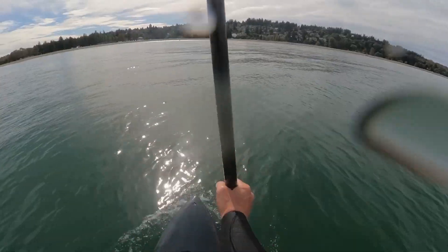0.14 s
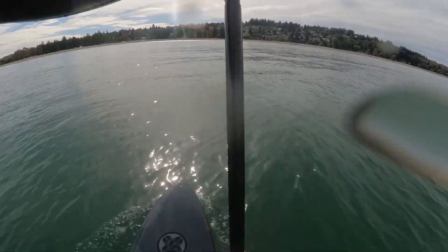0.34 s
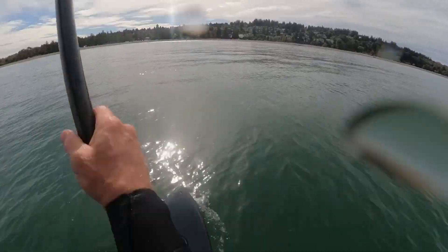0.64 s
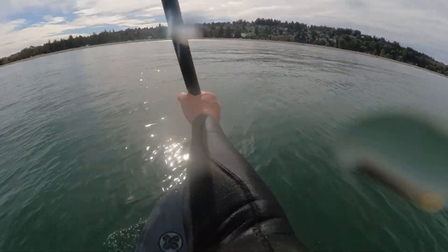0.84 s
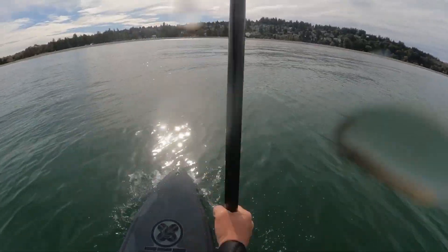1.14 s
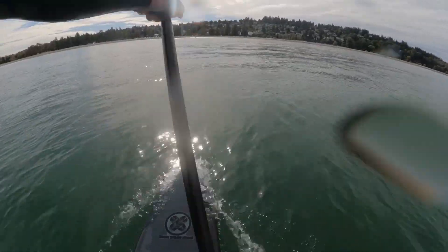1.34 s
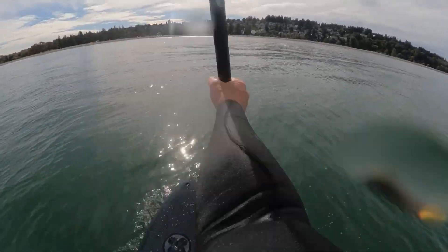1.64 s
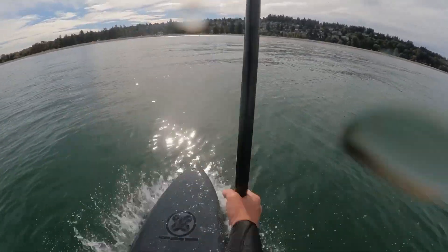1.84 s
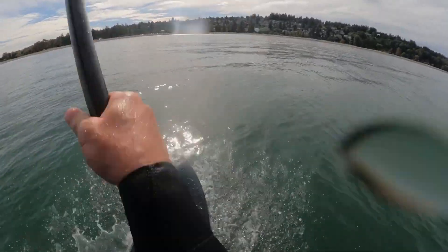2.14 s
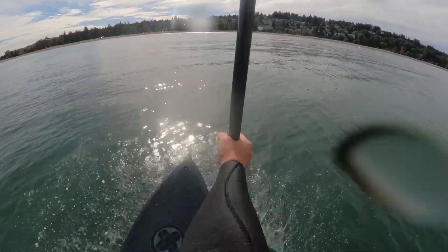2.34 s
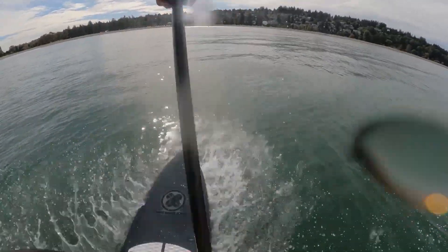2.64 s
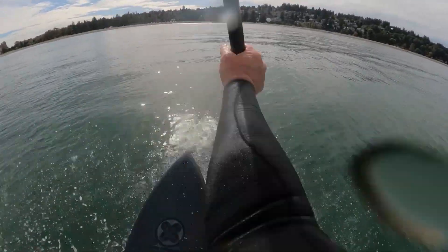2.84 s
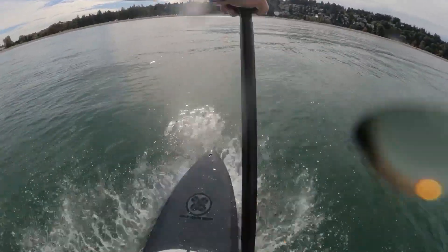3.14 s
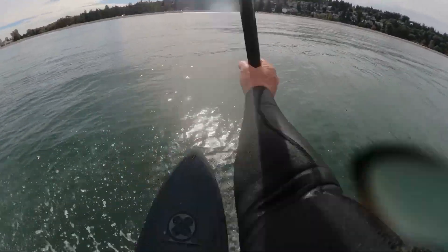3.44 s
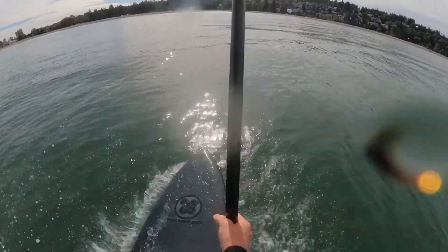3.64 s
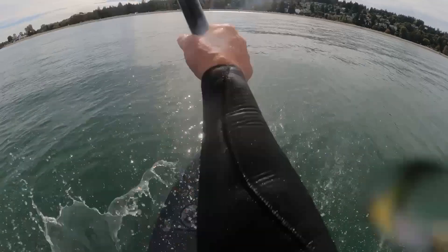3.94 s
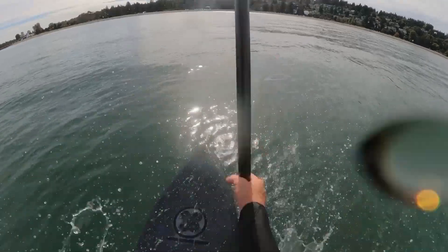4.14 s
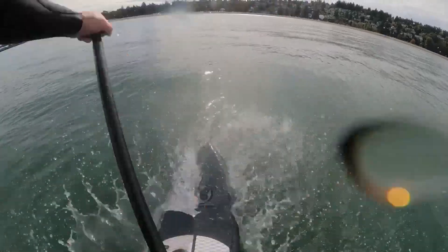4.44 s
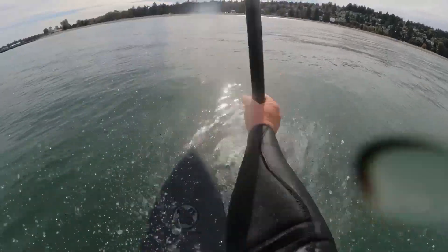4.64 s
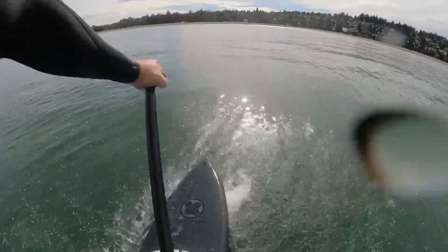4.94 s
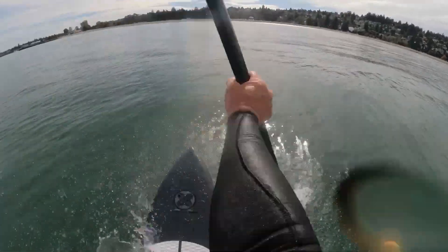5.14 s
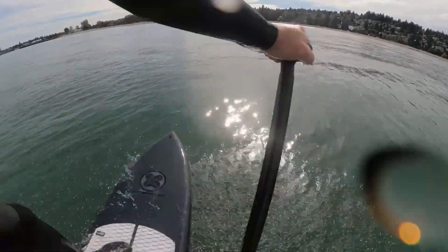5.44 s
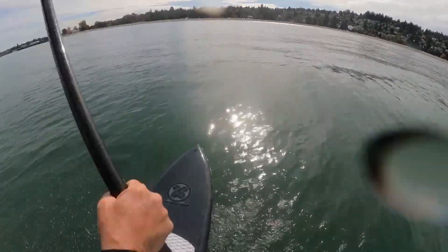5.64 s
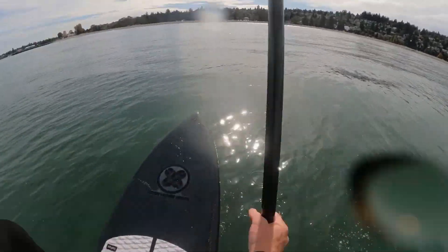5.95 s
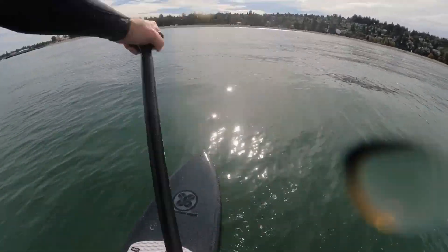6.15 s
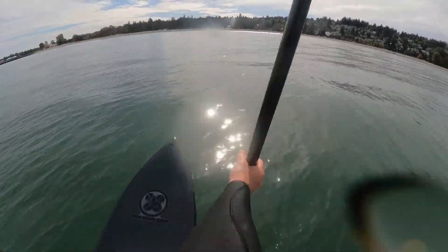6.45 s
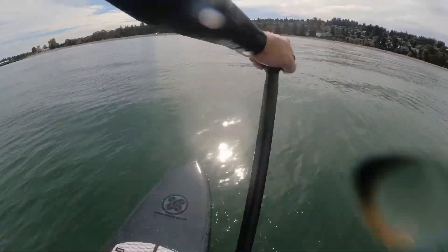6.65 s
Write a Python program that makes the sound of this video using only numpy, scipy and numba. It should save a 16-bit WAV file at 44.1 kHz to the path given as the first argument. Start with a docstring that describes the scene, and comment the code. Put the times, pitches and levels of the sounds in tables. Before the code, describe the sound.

A body-worn, wet camera close to the water catches a paddleboard crossing a choppy lake. From 0 to 0.8 s, low wind and soft bow wash carry small gurgles and a few plops. Around 0.9 to 1.4 s a paddle stroke brings a rush, dripping taps and a cluster of round plops. At 1.8 to 1.95 s the bow lands with a deep churning splash and slaps. More slaps come near 2.5, 3.1 and 3.7 s, with spray cracking on the case around 2.9 and 4.05 s. The heaviest thump and foamy burst is at 4.3 s; another slap and big plop follow at 4.95 to 5 s. Bubbly slaps and falling water return at 5.5 to 5.65 s, then a grainy splash with pattering drops at 6.1 to 6.35 s, settling into light wash and drips until about 7 s. Fine mist prickles and hisses; wind gusts rumble irregularly throughout.

```python
"""On a choppy lake a paddle board is driven forward, heard from a wet action camera worn by the paddler.
Bow wash and paddle strokes are clouds of ringing bubbles with foam hiss; larger bubbles plop and cavities gurgle.
The hull slaps on trapped air, modelled as chirping damped bubbles; spray is random clicks that ring the case.
Flung drops tap in short noise bursts, thrown sheets of water land in a grainy rush, and fine mist prickles
and hisses. Low-frequency noise, swelling in gusts, is the wind on the microphone."""
import sys
import numpy as np
from scipy import signal
from scipy.fft import rfft, irfft
from scipy.io import wavfile
from scipy.ndimage import uniform_filter1d
from numba import njit

SR = 44100
rng = np.random.default_rng(int(sys.argv[2]) if len(sys.argv) > 2 else 0)


def unload_audio(sound):
    """Save the sound as a 16-bit wav file, at the path given as the first command line argument."""
    columns = np.transpose(np.atleast_2d(sound))
    # keep every value between -1 and 1, then stretch to whole-number steps
    steps = np.round(np.clip(columns, -1, 1) * 32767)
    wavfile.write(sys.argv[1], SR, steps.astype(np.int16))


N = 299439

# thin high tick of a droplet on the case: frequency_hz, relative_gain_db
DROPLET_RESPONSE = [(3000, -46), (10700, -46.5), (11500, -9.5), (12200, 2.5), (13000, -10.5), (14200, -7),
                    (15500, -17)]
# hollow tap of a drop: frequency_hz, relative_gain_db
TAP_RESPONSE = [(300, -41), (900, 6.5), (1700, 4.5), (2200, -8.5), (3000, -27), (5000, -39), (9000, -77.5)]
# snap of a drop: frequency_hz, relative_gain_db
SNAP_RESPONSE = [(1000, -20), (1500, -6), (1900, 3.5), (2400, -7.5), (3000, -15.5), (4000, -31),
                 (8000, -58)]
# sharp edge of a drop's snap: frequency_hz, relative_gain_db
EDGE_RESPONSE = [(1500, -18.5), (2600, -10), (3600, 15.5), (4600, -7.5), (6000, -5.5), (7500, -28),
                 (9500, -30.5), (12000, -56.5)]


def wash(flutter_db=1.12, deep_db=0, flow_db=0.45, foam_db=0.55, surge_db=-2,
         gurgle_db=-7.0, fizz_db=-6.0, pop_db=-9, spatter_db=-10):
    """Bubble-cloud radiation: torn water sums many short damped oscillations, under a foam hiss."""
    # steady wash along the bow, before trims: time_s, rushing_db, churning_db, foam_db
    bow_levels = [(0.0, -40, -42.5, -50), (.17, -36, -37.5, -49.5), (.29, -43, -34.5, -52),
                  (0.47, -41, -29, -51.5), (.66, -38, -35, -53), (0.87, -37, -32, -47.5),
                  (1.1, -34, -33, -47.5), (1.3, -31, -32.5, -46), (1.91, -32.5, -31.5, -50),
                  (2.36, -36, -35, -46.5), (2.8, -34.5, -32, -51.5), (2.98, -31, -39.5, -50.5),
                  (3.08, -31.5, -26, -51.5), (3.38, -33, -34.5, -51.5), (3.72, -33, -37, -47),
                  (3.88, -33, -29.5, -50), (4.03, -36, -34, -52), (4.13, -35.5, -42.5, -48.5),
                  (4.25, -33, -29, -47.5), (4.44, -40, -33.5, -52.5), (4.6, -34, -34, -57.5),
                  (4.84, -37.5, -40, -49), (4.99, -35, -31, -47.5), (5.25, -39.5, -38.5, -54.5),
                  (5.36, -48, -39, -58), (5.45, -39.5, -37, -50.5), (5.76, -41, -30.5, -53.5),
                  (5.88, -39, -41.5, -53), (6.06, -35, -29.5, -57), (6.26, -37, -24.5, -53),
                  (6.44, -30, -35.5, -53.5), (6.5, -39.5, -33, -52.5), (6.6, -37, -34, -51),
                  (6.79, -37, -37, -47)]
    # water pushed aside by a stroke or a landing of the bow, before surge_db:
    # full_s, hold_s, rushing_db, churning_db, foam_db
    surge_events = [(0.372, 0.094, -32, -32, -47.5), (0.763, 0.029, -32, -47, -47),
                    (0.95, 0.07, -23.5, -40, -44), (1.255, 0.12, -28.5, -39, -48),
                    (1.525, 0.042, -27, -35, -47), (1.837, 0.041, -21.5, -15.5, -49),
                    (1.931, 0.015, -18.5, -26.5, -42.5), (2.108, 0.12, -28.5, -30, -62),
                    (2.34, 0.11, -28, -32.5, -65.5), (2.496, 0.11, -22.5, -21, -44.5),
                    (2.645, 0.014, -26.5, -22.5, -63), (2.884, 0.041, -34.5, -47, -42),
                    (3.079, 0.06, -24.5, -34, -42.5), (3.167, 0.01, -26, -21, -46),
                    (3.614, 0.088, -41, -30.5, -50), (3.721, 0.02, -22.5, -25.5, -43),
                    (3.778, 0.038, -32.5, -23, -46.5), (4.021, 0.018, -29.5, -27.5, -54),
                    (4.193, 0.032, -30, -28.5, -59), (4.292, 0.019, -21, -15, -36.5),
                    (4.92, 0.069, -30, -21.5, -45.5), (5.052, 0.069, -36.5, -27.5, -68),
                    (5.4, 0.02, -38, -42, -48), (5.5, 0.062, -27, -22, -47.5),
                    (5.601, 0.1, -27.5, -20.5, -47.5), (5.975, 0.012, -32.5, -33, -58),
                    (6.143, 0.28, -30.5, -37, -51), (6.758, .04, -34, -47.5, -46)]
    # torn water: frequency_hz, relative_gain_db
    water_response = [(70, -14), (130, 2), (220, 0), (450, 0), (700, -3), (950, -5), (1250, -13),
                      (1800, -23), (2500, -36.5), (4000, -47), (8000, -78)]
    # foam: frequency_hz, relative_gain_db
    foam_response = [(600, -22.5), (1200, -3.5), (1550, -2), (2000, -8), (2500, -10.5), (2800, -12),
                     (3050, -18), (3700, -18), (4200, -32), (4800, -27.5), (5700, -31.5), (6400, -38.5),
                     (7300, -37), (9500, -62)]
    attack_s, release_s = 0.016, 0.019

    torn = cloud(count=16000, spread_db=1.5, ring_cycles=4.54, glide=0.16, low_hz=106.3, high_hz=2623)
    gurgles = cloud(count=700, spread_db=4, ring_cycles=16, glide=0.32, low_hz=190, high_hz=2200)
    pops = cloud(count=300, spread_db=2.0, ring_cycles=8, glide=0.25, low_hz=450, high_hz=3200)
    mixture = torn + undb(gurgle_db) * gurgles + undb(pop_db) * pops
    water = colour(mixture, water_response)
    deep = below(water, 427)
    rushing = water - deep

    fizz = cloud(count=5000, spread_db=2.6, ring_cycles=16, glide=0.08, low_hz=1100, high_hz=4200)
    # the countless smallest bubbles merge into a hiss that comes in patches
    patches = undb(0.7 * walk(22))
    hiss = colour(undb(fizz_db) * fizz + rng.standard_normal(N), foam_response)
    foam = unit(patches * hiss) + undb(spatter_db) * spatter()

    full, hold, *surge_levels = np.transpose(surge_events)
    gains = []
    for bow, trim, level in zip(curves(bow_levels), (flow_db, deep_db, foam_db), surge_levels):
        surge = swells(full, hold, level + surge_db, attack_s, release_s)
        gains.append(np.hypot(undb(bow + trim), surge))  # powers add
    flow, churn, froth = gains
    mix = churn * unit(deep) + flow * unit(rushing) + froth * foam
    return mix * undb(flutter_db * walk(30))


def cloud(count, spread_db, ring_cycles, glide, low_hz, high_hz, swell=3.2):
    """Superposition of incoherent bubbles at random moments; small, high-pitched ones are the most common."""
    when, pitch, life, sign = rng.random((count, 4)).T
    hz = low_hz * (high_hz / low_hz) ** np.sqrt(pitch)
    cycles = ring_cycles * 2 ** (2 * life - 1)
    strength = undb(spread_db * np.minimum(rng.exponential(size=count), 3))
    # the square root offsets the shorter ringing of small bubbles
    size = np.sign(sign - 0.5) * strength * np.sqrt(hz / cycles)
    return unit(bubbles(when * N / SR, hz, cycles, size, glide, swell))


def spatter():
    """Random impacts: stray drops tap and snap on the water in loose clusters."""
    taps, snaps, edges = (patter(rate=260, spread_db=1.6) for _ in range(3))
    clusters = undb(1.5 * walk(14))
    hollow = colour(taps + snaps, TAP_RESPONSE)
    crisp = colour(snaps, SNAP_RESPONSE)
    sharp = 0.25 * colour(snaps + edges, EDGE_RESPONSE)
    return unit(clusters * (hollow + crisp + sharp))


def slaps(count=14, glide=0.16, low_hz=230, high_hz=1100, churn_db=-3, tilt=1.0, swell=0.34,
          smack_hz=750, smack_db=-5, muffle_hz=1900, trim_db=3.0):
    """Air-pocket resonance: a slap traps a small, then a large pocket that thump and break into bubbles."""
    # hull or blade slapping the water, levels before trims; churn is relative to the pocket:
    # start_s, level_db, pocket_hz, cycles_to_minus_20_db, churn_db, churn_length_s
    slap_events = [(1.867, -11.5, 190, 8.2, 7, 0.024), (1.936, -10, 206, 3.6, 1, 0.027),
                   (2.525, -9, 327, 18, 5, 0.032), (2.543, -7.5, 216, 6.9, -2, 0.04),
                   (3.115, -8, 279, 4.6, 1, 0.028), (3.144, -6.5, 347, 4.5, -8, 0.02),
                   (3.654, -17, 206, 9.9, -7, 0.03), (3.718, -4, 267, 2.5, -1, 0.016),
                   (3.781, -9.5, 277, 1.5, -4.5, 0.031), (4.305, 2, 187, 1.6, -8, 0.026),
                   (4.869, -11.5, 216, 13, -4, 0.019), (4.949, -1, 237, 3.7, -15, 0.027),
                   (5.518, -20.5, 337, 8.2, -8.5, 0.029), (5.572, -11, 354, 8.7, -5, 0.021),
                   (5.63, -12.5, 375, 2.8, 1, 0.034), (5.663, -15.5, 330, 3.5, 3.5, .03),
                   (6.129, -9, 420, 6.4, -3, 0.016), (6.142, -12, 162, 3.9, -19, .015)]
    # a smaller pocket closes just before the main one
    lead_s, lead_ratio, lead_db = 0.00592, 1.7, -10

    rows = []  # start_s, pitch_hz, cycles, size
    for s, db, hz, cycles, break_db, length in slap_events:
        when, pitch, life, sign = rng.random((count, 4)).T
        small_hz = low_hz * (high_hz / low_hz) ** pitch
        strength = undb(db + break_db + churn_db) * (low_hz / small_hz) ** tilt
        size = np.sign(sign - 0.5) * strength
        lead = (s - lead_s, hz * lead_ratio, cycles, undb(db + lead_db))
        smack = (s, smack_hz, 1.5, undb(db + smack_db))
        pocket = (s, hz, cycles, undb(db))
        fragments = zip(s - lead_s + length * when, small_hz, 1.8 + 3 * life, size)
        rows += [lead, smack, pocket, *fragments]
    thumps = bubbles(*np.array(rows).T.copy(), glide, swell)
    return undb(trim_db) * below(thumps, muffle_hz)


def plops(glide=0.039, swell=4.1, trim_db=-2.0):
    """Single-bubble resonance: lone bubbles pinched off by the blade and by falling drops ring and decay."""
    # single large bubbles, before trim_db: start_s, level_db, pitch_hz, cycles_to_minus_20_db
    plop_events = [(0.149, -7.5, 380, 4.5), (0.424, -19, 470, 2.6), (0.488, -11.5, 132, 4.6),
                   (.53, -11, 970, 6.4), (.827, -11.5, 444, 3.9), (.906, -13, 300, 3.4),
                   (.935, -10, 250, 5.7), (.979, -9, 600, 5), (1.005, -7.5, 905, 6.5),
                   (1.045, 1.5, 197, 1.7), (1.046, -4, 635, 3), (1.122, -13.5, 808, 15),
                   (1.141, -6, 780, 8.1), (1.143, -3.5, 309, 3.4), (1.289, -6.5, 444, 3.3),
                   (1.404, -1, 323, 1.7), (1.666, -13.5, 953, 28), (1.743, -8.5, 716, 3.9),
                   (1.773, -7, 280, 3.8), (2.010, -14, 857, 8.1), (2.243, -14.5, 930, 11),
                   (2.283, -13.5, 920, 6), (2.296, -7, 486, 3.8), (2.341, -19.5, 1440, 49),
                   (2.382, -12.5, 865, 7.9), (2.867, -12.5, 1240, 3.9), (2.899, -7.5, 1730, 11),
                   (2.901, -4, 570, 5.3), (3.033, -4, 915, 5.1), (3.310, -12, 840, 7.4),
                   (3.571, -12, 1080, 6.6), (3.622, -14, 856, 7), (3.845, -18, 470, 13),
                   (3.884, -21, 804, 9), (4.324, -11.5, 874, 9.4), (4.529, -11, 477, 10),
                   (4.610, -11.5, 577, 10), (4.993, 1.5, 331, 3), (5.093, -9, 241, 5.1),
                   (5.342, -23, 580, 11), (5.451, -22, 1120, 15), (5.459, -26, 1230, 9.2),
                   (5.467, -19, 1070, 9), (5.561, -14, 944, 29), (5.919, -11.5, 940, 4),
                   (5.984, -18.5, 1225, 12), (6.028, -5.5, 410, 4.1), (6.027, -16, 750, 4),
                   (6.047, -15, 513, 1.9), (6.122, -9.5, 945, 11), (6.144, -2, 390, 4.5),
                   (6.517, -12.5, 610, 3.7)]
    s, db, hz, cycles = np.array(plop_events, float).T.copy()
    return bubbles(s, hz, cycles, undb(db + trim_db), glide, swell)


def drips(tap_db=-2, snap_db=-2, edge_db=-6):
    """Impulsive excitation: each flung drop is a brief decaying noise burst, filtered to tap, snap and edge."""
    # drops off the paddle tapping water and deck, before trims:
    # start_s, hollow_tap_db, snap_db, sharp_edge_db, decay_time_constant_s
    drip_events = [(0.317, -44, -44, -45.5, 0.0088), (0.431, -36, -48, -46, 0.005),
                   (.778, -42, -50, -62, .0055), (0.816, -31.5, -33.5, -50, 0.0055),
                   (.903, -21, -22, -46, 0.0021), (.962, -30, -44.5, -41, 0.0055),
                   (1.068, -36, -36, -46, 0.0064), (1.080, -28, -36, -50, 0.0047),
                   (1.141, -24, -35, -54, 0.0048), (1.160, -35, -42, -57, .003),
                   (1.403, -37, -42, -41, .005), (1.502, -44, -49, -37, 0.0047),
                   (1.830, -24, -46.5, -57, .004), (2.150, -25.5, -48, -57, .0055),
                   (2.342, -23, -45.5, -60, 0.0051), (2.41, -23, -34, -50, 0.006),
                   (2.494, -21, -43, -56, 0.0047), (2.826, -27, -40, -56, .004),
                   (2.925, -22, -41, -56, .004), (2.941, -28, -45, -58, 0.0036),
                   (3.012, -25, -33, -67, 0.0031), (3.022, -21, -42, -68, .003),
                   (3.035, -24, -44, -62, 0.0066), (3.570, -32, -51, -60, 0.0062),
                   (3.657, -30, -38.5, -52, 0.0046), (3.785, -25.5, -37, -54, 0.0068),
                   (4.875, -33, -42, -65, .0055), (5.160, -60, -57, -43, 0.0037),
                   (5.511, -30, -43, -55, .004), (5.626, -23.5, -42, -60, 0.0036),
                   (5.794, -33, -44, -51, 0.0063), (5.962, -31.5, -56, -49, .0055),
                   (6.12, -32, -37, -38, 0.0062), (6.263, -26, -28, -54, 0.0065),
                   (6.346, -30, -38, -50, 0.0044), (6.400, -41, -44, -44, .003),
                   (6.462, -41, -52, -45, .004), (6.532, -28, -43, -44, 0.0077),
                   (6.642, -31.5, -41, -43, 0.0071), (6.745, -42, -51, -45, .0055)]
    age = np.arange(SR // 25) / SR
    taps, snaps, edges = np.zeros((3, N + len(age)))
    for s, hollow_db, crisp_db, sharp_db, burst_s in drip_events:
        span = slice(int(s * SR), int(s * SR) + len(age))
        burst = rng.choice([-1, 1], len(age)) * np.exp(-age / burst_s)
        taps[span] += undb(hollow_db + tap_db) * burst
        snaps[span] += undb(crisp_db + snap_db) * burst
        edges[span] += undb(sharp_db + edge_db) * burst
    hollow = colour(taps[:N], TAP_RESPONSE)
    return hollow + colour(snaps[:N], SNAP_RESPONSE) + colour(edges[:N], EDGE_RESPONSE)


def spray(trim_tick_db=-4, crack_tail_s=0.0041, ring_db=-4):
    """Impact excitation: drops drum on the case, which rings and ticks; a square hit cracks."""
    # gouts of spray striking the camera; tick (before its trim) and crack are relative to level_db:
    # full_s, level_db, hold_s, rise_s, tail_s, tick_db, crack_db
    splat_events = [(1.813, -37, 0.005, 0.004, 0.006, -57, 1),
                    (1.841, -35.5, 0.037, 0.004, 0.01, -53.5, -4),
                    (1.935, -35, 0.015, 0.004, 0.01, -57, -11),
                    (2.338, -34, 0.0055, 0.0033, 0.011, -49, -10),
                    (2.504, -29, .0056, 0.003, 0.02, -33, -15), (2.845, -38, 0.02, 0.01, 0.0091, -15.5, -9),
                    (2.866, -23, 0.0042, 0.003, 0.0068, -20.5, -1.5),
                    (2.898, -21.5, 0.0075, 0.006, 0.01, -28, -10),
                    (2.919, -28.5, .008, .003, 0.009, -32, -16),
                    (4.038, -25.5, 0.0073, 0.012, 0.008, -30, -6),
                    (4.052, -21.5, 0.0064, 0.008, 0.0075, -27, -11),
                    (4.063, -26.5, 0.0053, 0.003, 0.01, -35, -8),
                    (4.61, -27.5, 0.014, 0.004, 0.022, -18, -5.5),
                    (4.856, -34.5, 0.013, 0.004, 0.015, -43, -10),
                    (6.122, -28, 0.0089, 0.0059, 0.0092, -28, -17),
                    (6.264, -32, 0.014, 0.0028, 0.0082, -48, -1)]
    # drumming of the case: frequency_hz, relative_gain_db
    case_response = [(100, -9), (250, 12.5), (580, 8), (1000, 10.5), (1280, 8), (1600, 3.5), (2100, -8.5),
                     (2500, -17.5), (3800, -17), (5000, -37.5), (7500, -57), (10300, -84), (12200, -46.5),
                     (15500, -59)]
    # crack of a square hit: frequency_hz, relative_gain_db
    crack_response = [(900, -30.5), (1400, 4.5), (1750, -1), (2150, 0.5), (2400, -20.5), (2750, -7.5),
                      (3150, -31.5), (3700, -27.5), (4500, -49.5), (9000, -65)]

    full, db, hold, rise_s, tail_s, tick_db, crack_db = np.transpose(splat_events)
    thud = swells(full, hold, db, rise_s, tail_s)
    tick = swells(full, hold, db + tick_db + trim_tick_db, rise_s, tail_s)
    crack = swells(full, hold * 0.45, db + crack_db, rise_s, crack_tail_s)
    drops = patter(rate=2600, spread_db=1.7)
    large_drops = patter(rate=900, spread_db=6.0)  # the strongest of these tick hardest
    force = thud * drops
    body = colour(force, case_response) + undb(ring_db) * case_ring(force)
    ticks = colour(tick * unit(drops + large_drops), DROPLET_RESPONSE)
    cracks = colour(crack * rng.standard_normal(N), crack_response)
    return body + ticks + cracks


def case_ring(force):
    """Modal synthesis: a force convolved with the sum of the case's damped sinusoidal modes."""
    # modes of the struck camera case: frequency_hz, relative_level_db, t60_s
    modes = [(658, 2.5, 0.11), (980, 1.5, 0.12), (1462, -3.5, 0.18), (1714, -8.5, 0.067),
             (2110, -10, 0.093), (2600, -22, 0.15)]
    age = np.arange(SR // 5) / SR
    response = sum(undb(db - 60 * age / t60) * np.sin(2 * np.pi * hz * age) for hz, db, t60 in modes)
    return signal.fftconvolve(force, response / np.linalg.norm(response))[:N]


def glugs(width_hz=90, trim_db=0):
    """Cavity resonance: the pitch climbs as the cavity shrinks, while churning modulates the ringing."""
    # gurgling air cavities: start_s, length_s, level_db, start_hz, end_hz
    glug_events = [(0.101, 0.036, -30, 342, 355), (0.33, 0.14, -27, 173.6, 195),
                   (0.405, 0.067, -25.5, 441, 495), (0.47, 0.097, -30, 121, 133),
                   (0.54, 0.021, -26.5, 333, 640), (0.601, 0.054, -31.5, 170.6, 319),
                   (0.699, 0.03, -28, 614, 1125), (1.303, 0.04, -40, 1730, 2220),
                   (2.285, 0.027, -28, 508, 730), (3.41, 0.067, -28.5, 267, 473),
                   (3.572, 0.05, -18.5, 202, 245), (3.9, 0.084, -29, 360, 503),
                   (4.008, 0.035, -23, 422, 534), (4.194, 0.048, -27, 477, 636),
                   (5.373, 0.11, -33, 261.6, 338), (5.636, 0.084, -24.5, 297, 364)]
    out = np.zeros(N)
    stir = (1 + walk(width_hz) + 1j * walk(2 * width_hz)) / np.sqrt(2)  # uneven amplitude and phase
    for s, length, db, start_hz, end_hz in glug_events:
        age = np.linspace(0, 1, int(length * SR))
        span = slice(int(s * SR), int(s * SR) + len(age))
        hz = start_hz * (end_hz / start_hz) ** age
        phase = 2 * np.pi * np.cumsum(hz) / SR
        envelope = np.sqrt(np.abs(np.sin(np.pi * age)))
        out[span] += undb(db + trim_db) * envelope * np.imag(stir[span] * np.exp(1j * phase))
    return out


def sheets(attack_s=0.01, release_s=0.027):
    """Superposed impacts: many drops of thrown water land together in a grainy rush with a sizzle on top."""
    # sheets of water landing on the lake: full_s, hold_s, rushing_db, sizzle_db
    sheet_events = [(.965, 0.041, -30, -51.5), (1.067, 0.014, -34, -49.5), (2.125, 0.19, -31.5, -65),
                    (4.674, 0.035, -40, -47.5), (4.741, 0.015, -28.5, -60), (5.618, 0.038, -23.5, -55),
                    (6.114, 0.074, -28, -45.5), (6.18, 0.11, -23.5, -48), (6.31, .05, -25, -48.5)]
    # rush: frequency_hz, relative_gain_db
    rush_response = [(150, -13.5), (400, 4.5), (700, 1), (1000, -2.5), (1300, -10), (1800, -21.5),
                     (2200, -34.5), (4000, -43.5), (8000, -73)]
    # sizzle: frequency_hz, relative_gain_db
    sizzle_response = [(1200, -19), (2000, 5.5), (2400, -0.5), (2750, 3), (3150, -5.5), (3500, -13),
                       (4200, -27.5), (8000, -46)]
    full, hold, rush_db, sizzle_db = np.transpose(sheet_events)
    heavy = patter(rate=3000, spread_db=1.8)
    fine = patter(rate=1800, spread_db=3)
    rush = swells(full, hold, rush_db, attack_s, release_s) * heavy
    sizzle = swells(full, hold, sizzle_db, attack_s, release_s) * fine
    return colour(rush, rush_response) + colour(sizzle, sizzle_response)


def mist(tick_db=2, fall_db=-0.5, flurry_db=2):
    """Random-impact noise: fine droplets prickle on the camera in flurries and hiss as they fall on the lake."""
    # fine spray, before trims: time_s, ticking_on_camera_db, hiss_on_lake_db
    mist_levels = [(0.05, -108, -77), (0.5, -108, -78), (1.41, -108, -71.5), (1.81, -102, -68.5),
                   (2.13, -74.5, -78), (2.54, -75, -78.5), (2.7, -69, -71), (3.43, -74.5, -75.5),
                   (3.65, -83, -75.5), (3.89, -85, -84), (4.36, -71, -62.5), (4.55, -71, -68.5),
                   (4.82, -75, -63.5), (5.36, -77, -68), (5.52, -64.5, -64.5), (5.75, -72, -72),
                   (6.11, -73.5, -69), (6.27, -75, -78), (6.35, -101, -62.5), (6.57, -108, -72),
                   (6.72, -108, -72)]
    # droplets falling on the lake: frequency_hz, relative_gain_db
    fall_response = [(2000, -28.5), (3100, -8.5), (3600, -4), (4100, -0.5), (4500, -7), (4900, -21),
                     (6000, -23.5), (7300, -25.5), (9500, -43)]
    droplets = patter(rate=3000, spread_db=4)
    on_case, on_lake = curves(mist_levels)
    flurries = flurry_db * walk(3.2)
    prickle = undb(on_case + tick_db + flurries) * unit(colour(droplets, DROPLET_RESPONSE))
    hiss = undb(on_lake + fall_db) * unit(colour(rng.standard_normal(N), fall_response))
    return prickle + hiss


def wind(wind_db=0, eddy_s=0.047, waver_db=2):
    """Turbulent pressure: eddies push on the microphone port, scaled by a wavering breeze and gusts."""
    # gusts on the microphone: full_s, hold_s, level_db
    gust_events = [(0.02, 0.22, -31), (0.33, 0.026, -23), (0.642, 0.071, -22), (0.772, 0.31, -19.5),
                   (1.614, 0.066, -17), (1.743, 0.067, -17), (1.88, 0.071, -19.5), (2.11, 0.03, -25),
                   (2.422, 0.16, -17), (2.65, 0.14, -37), (2.877, 0.31, -17.5), (3.315, 0.032, -17.5),
                   (3.466, 0.044, -23), (3.6, 0.048, -19.5), (4.08, 0.026, -20.5), (4.166, 0.19, -21),
                   (4.507, 0.024, -22), (4.685, 0.019, -22.5), (4.75, 0.074, -16.5), (4.87, 0.099, -22),
                   (5.056, 0.055, -18.5), (5.208, 0.019, -17), (5.325, 0.088, -24), (5.522, 0.018, -26),
                   (5.786, 0.017, -24), (5.922, 0.063, -21.5), (6.135, 0.064, -20.5), (6.425, 0.2, -18),
                   (6.685, 0.11, -19.5)]
    # wind turbulence: frequency_hz, relative_gain_db
    wind_response = [(8, 1.5), (20, 5.5), (40, 1.5), (62, -5.5), (100, -12.5), (200, -27.5), (500, -43.5),
                     (2000, -97.5)]
    attack_s, release_s, breeze_db = 0.041, 0.013, -30
    eddies = colour(rng.standard_normal(N), wind_response)
    # dividing by the short-term rms leaves the level to breeze and gusts
    strength = np.sqrt(uniform_filter1d(eddies ** 2, int(eddy_s * SR)) + 1e-12)
    breeze = undb(breeze_db + waver_db * walk(4.6))
    push = np.hypot(breeze, swells(*np.transpose(gust_events), attack_s, release_s))
    return undb(wind_db) * push * eddies / strength


@njit
def bubbles(start, hz, cycles, size, glide, swell):
    """Damped oscillators: each swells over `swell` radians, falls 20 dB per `cycles` and rises in pitch."""
    out = np.zeros(N)
    for k in range(len(start)):
        # life is twice `cycles` periods of the starting pitch, a fall of 40 dB
        first, life, phase = int(start[k] * SR), 2 * cycles[k] * SR / hz[k], 0.
        for i in range(max(0, min(int(life), N - first))):
            age = i / life
            phase += 2 * np.pi * hz[k] * (1 + glide * age) / SR
            envelope = np.exp(-4.6 * age) * (1 - np.exp(-phase / swell))
            out[first + i] += size[k] * np.sin(phase) * envelope
    return out


def patter(rate, spread_db):
    """Poisson-like impacts: random clicks, `rate` per second on average, many faint and a few strong."""
    hit = rng.random(N) < rate / SR
    polarity = rng.choice([-1, 1], N)
    strength = undb(spread_db * np.minimum(rng.exponential(size=N), 4))
    return unit(hit * polarity * strength)


def swells(full, hold, db, attack_s, release_s):
    """Incoherent addition: gains rise to full level, hold and decay exponentially, and their powers add."""
    t, power = np.arange(N) / SR, 0
    for s, length, gain, rise, fall in np.broadcast(full, hold, undb(db), attack_s, release_s):
        attack = np.clip(1 + (t - s) / rise, 0, 1)
        release = np.exp(-np.clip((t - s - length) / fall, 0, 20))
        power = power + (gain * attack * release) ** 2
    return np.sqrt(power)


def walk(rate):
    """Low-frequency modulation: smoothed random steps, `rate` per second, scaled to rms 1."""
    k = int(SR / rate)
    steps = np.repeat(rng.standard_normal(N // k + 1), k)
    return unit(uniform_filter1d(steps, k)[:N])


def colour(x, points):
    """Minimum-phase filtering: a causal response from relative gains; white noise keeps its power."""
    hz, db = np.transpose(points)
    size = 4096
    f = np.maximum(np.fft.rfftfreq(size, 1 / SR), 1)
    cepstrum = irfft(np.log(undb(np.interp(np.log(f), np.log(hz), db))))
    # folding the cepstrum onto positive time makes the response causal
    cepstrum[1:size // 2] *= 2
    cepstrum[size // 2 + 1:] = 0
    response = irfft(np.exp(rfft(cepstrum)))
    return signal.fftconvolve(x, response / np.linalg.norm(response))[:len(x)]


def below(x, hz):
    """Zero-phase low-pass filtering: forward and backward passes cancel the delay."""
    return signal.sosfiltfilt(signal.butter(3, hz, fs=SR, output="sos"), x)


def curves(table):
    """Linear interpolation: each column after the time as a value per sample."""
    s, *columns = np.transpose(table)
    return [np.interp(np.arange(N) / SR, s, c) for c in columns]


def undb(db):
    """Logarithmic level: decibels to amplitude gain."""
    return 10 ** (np.asarray(db) / 20)


def unit(x):
    """Root-mean-square normalisation: scale to rms 1."""
    return x / np.sqrt(np.mean(x ** 2) + 1e-18)


def scene():
    """Linear superposition: water, spray and wind add at one microphone."""
    return (wash() + slaps() + plops() + drips() + spray() + mist() + wind() + glugs() + sheets())[None]


def record(dry):
    """Saturation and band limiting: the camera rounds the loudest peaks and cuts the top."""
    rounded = np.tanh(0.95 * dry) / 1.104
    top_hz, ripple_db, stop_db = 15700, 0.2, 80
    return signal.sosfilt(signal.ellip(8, ripple_db, stop_db, top_hz, fs=SR, output="sos"), rounded)


dry = scene()
out = record(dry)
unload_audio(out)
```